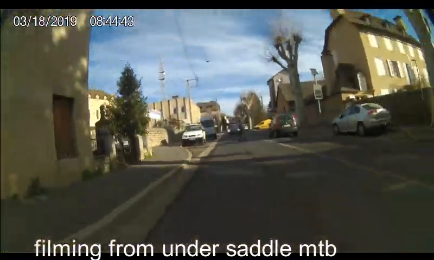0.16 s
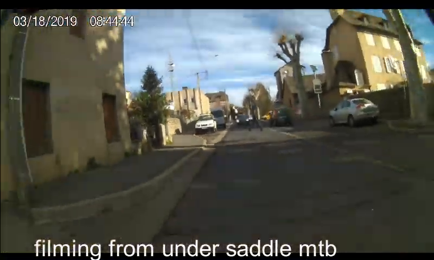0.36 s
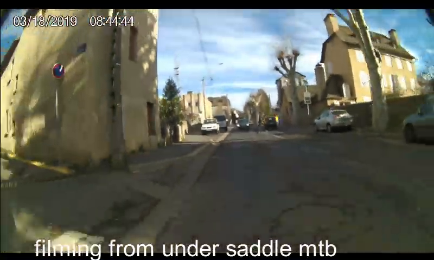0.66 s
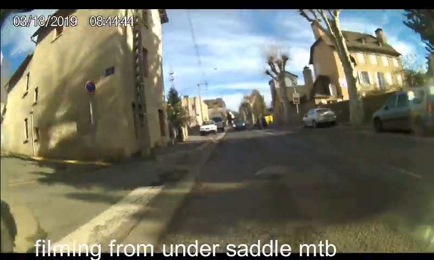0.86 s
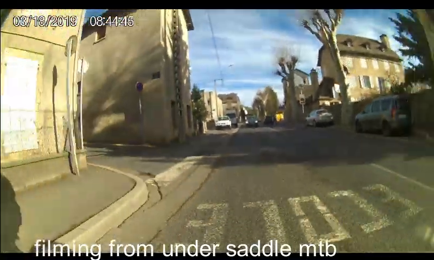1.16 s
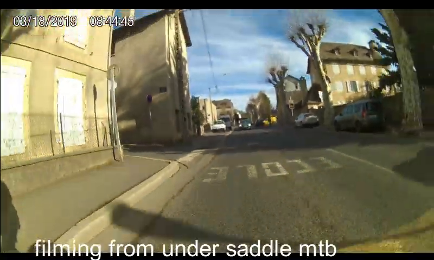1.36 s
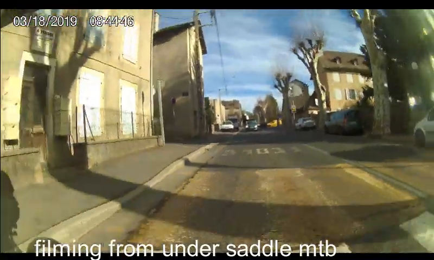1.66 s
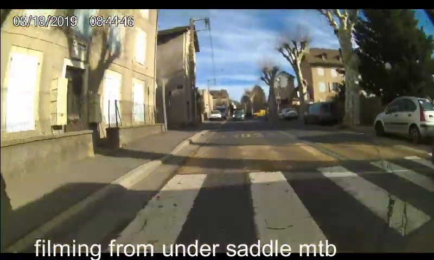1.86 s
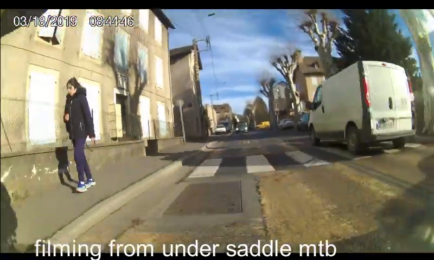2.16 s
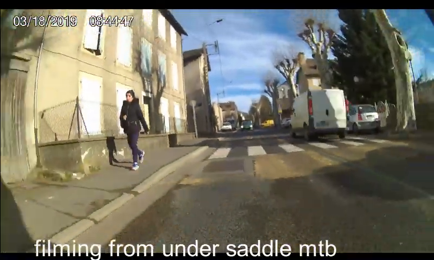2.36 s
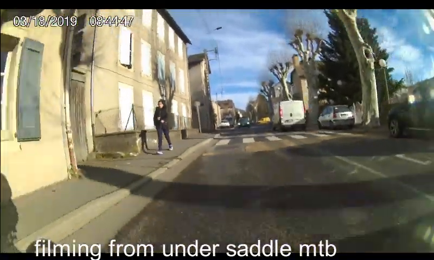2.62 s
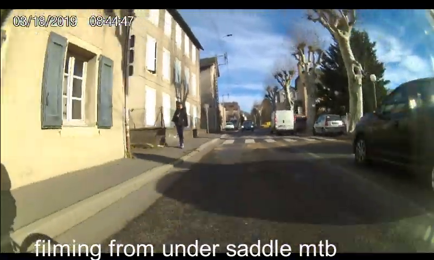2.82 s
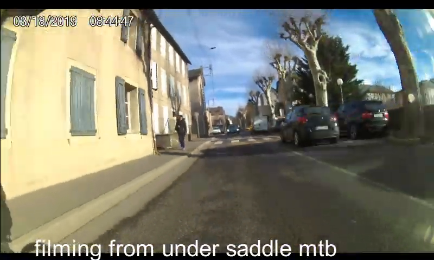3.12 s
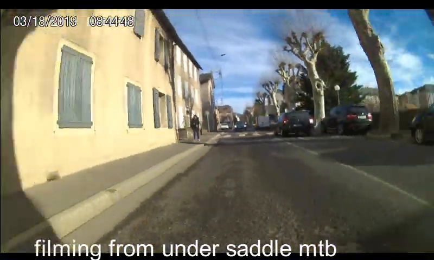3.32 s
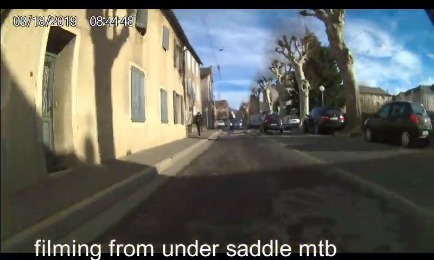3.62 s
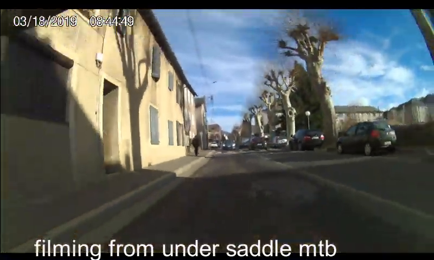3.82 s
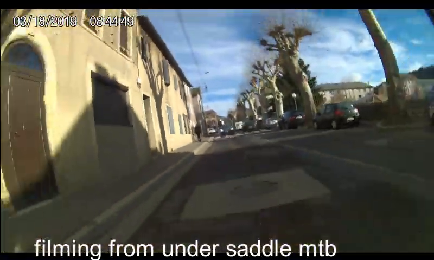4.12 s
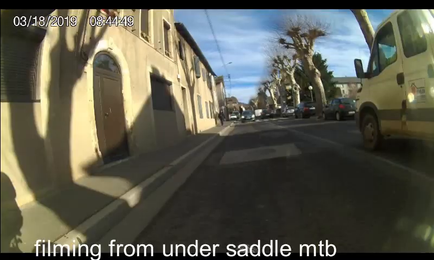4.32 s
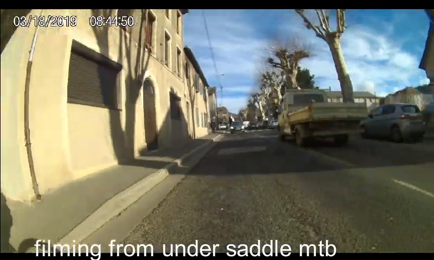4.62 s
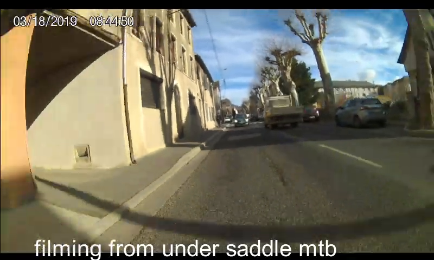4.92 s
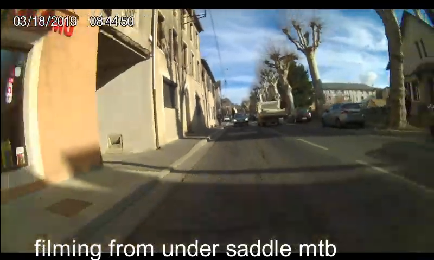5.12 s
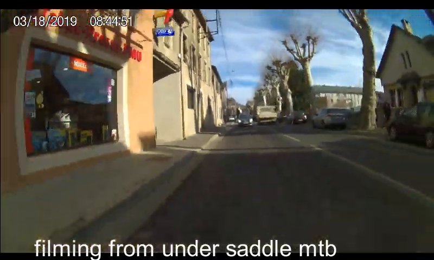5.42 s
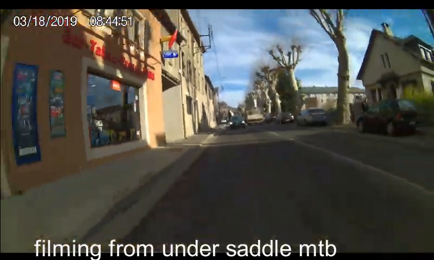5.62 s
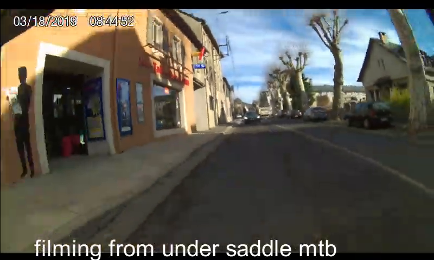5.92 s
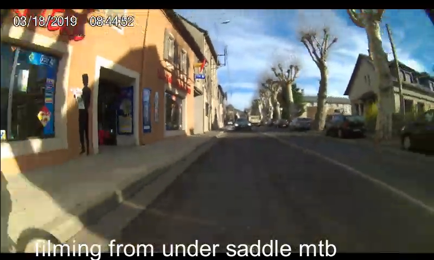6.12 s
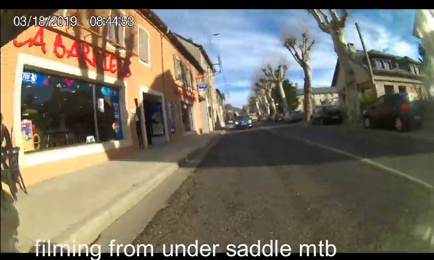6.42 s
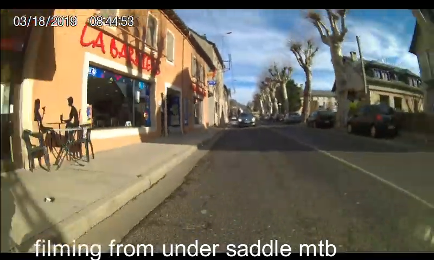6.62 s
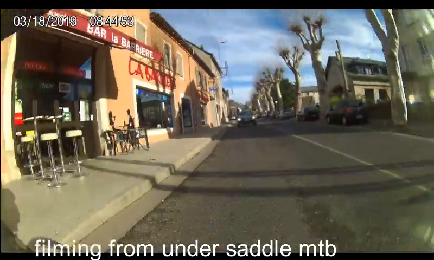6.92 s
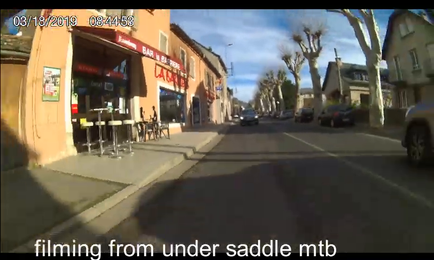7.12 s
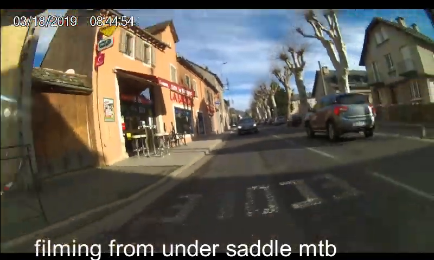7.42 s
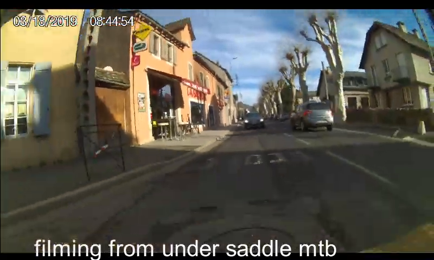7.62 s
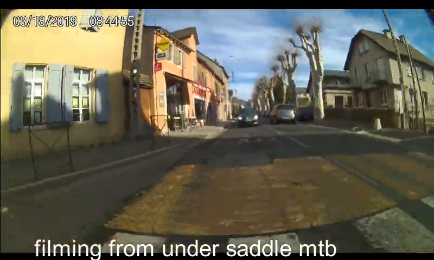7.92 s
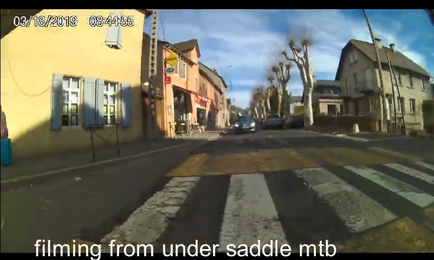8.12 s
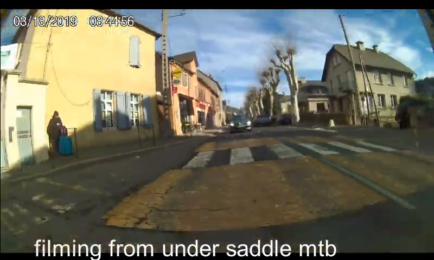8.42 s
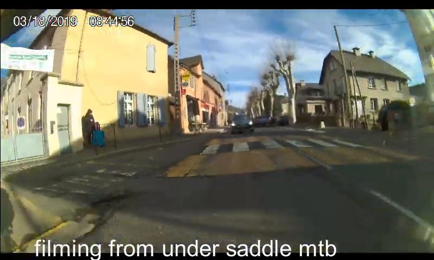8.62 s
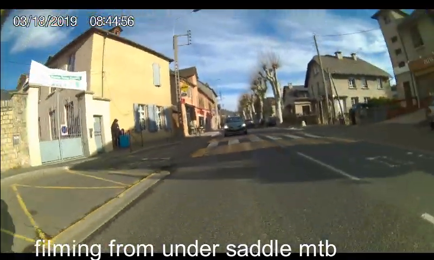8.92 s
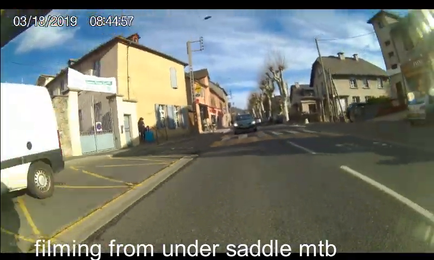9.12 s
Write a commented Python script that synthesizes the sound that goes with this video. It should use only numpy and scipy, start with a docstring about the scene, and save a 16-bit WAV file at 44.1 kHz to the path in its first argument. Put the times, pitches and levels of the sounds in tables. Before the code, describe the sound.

Sharp, irregular plastic clacks and ticks from a loose bicycle mount, with faint road rumble underneath.

```python
"""Under a bicycle saddle, rolling over worn asphalt: a small camera knocks about in its plastic case.
Each jolt throws it against the case, which rings for milliseconds, brighter the harder the blow.
It rebounds, then swings on its loose mount, one rattle a swing. Hard knocks set the joint chattering
and ticking. Road buzz and tyre hum come up through the frame. The camera's fast limiter flattens
the hard knocks."""
import sys
import numpy as np
from scipy import signal
from scipy.fft import rfft, irfft
from scipy.io import wavfile
from scipy.ndimage import uniform_filter1d, minimum_filter1d

SR = 44100
rng = np.random.default_rng(int(sys.argv[2]) if len(sys.argv) > 2 else 0)


def persist_wave(psi):
    """Save psi, clipped to +-1, as 16-bit WAV."""
    counts = np.round(np.clip(psi, -1, 1) * 32767).astype(np.int16)
    wavfile.write(sys.argv[1], SR, np.atleast_2d(counts).T)


N = 408366

# Camera hits case. Each row: start in seconds, relative level in dB.
KNOCKS = [(0.02, -2), (0.074, 0.5), (0.2765, 6.5), (0.3615, 9.5), (0.3992, -5), (0.4354, 7), (0.4754, 5.5),
          (0.5156, 2.5), (0.5982, 7.5), (0.679, -3.5), (0.8381, 2.5), (0.9231, 4.5), (1.042, 6),
          (1.128, -2), (1.249, -9), (1.3441, 4), (1.4993, 4.5), (1.6926, 3), (1.792, -0.5), (1.8641, 2),
          (1.9264, -3.5), (2.1766, 4.5), (2.2594, 3), (2.3529, 9), (2.4145, 4), (2.4929, 4.5), (2.5772, 4),
          (2.6584, 7), (2.745, 2), (2.809, 2.5), (3.0967, 18.5), (3.1618, -6), (3.1719, -4), (3.2166, 12.5),
          (3.2331, -3.5), (3.314, 9.5), (3.4208, 13), (3.551, 14), (3.626, 12.5), (3.6642, 5),
          (3.8364, 2.5), (3.9454, 5.5), (4.0795, -4), (4.1459, -3.5), (4.217, 6), (4.3386, 0),
          (4.4214, 6.5), (4.498, 3.5), (4.5503, 1), (4.645, -10.5), (4.7153, -6), (4.765, 1.5), (4.826, 3),
          (4.9244, 4), (5.0402, -0.5), (5.151, -12), (5.1883, -0.5), (5.2228, 16), (5.3139, 13.5),
          (5.4352, 12.5), (5.5197, 15), (5.5363, 2), (5.556, -7), (5.6033, -16.5), (5.6341, 17),
          (5.7182, 1), (5.7346, -3.5), (5.756, 12.5), (5.8802, 15.5), (5.9921, 11), (6.116, 12),
          (6.2279, 6.5), (6.2881, -2), (6.3504, 13), (6.46, -14), (6.5357, 6), (6.5728, 12.5),
          (6.6578, 12.5), (6.7548, -11), (6.787, 7), (6.8789, -6), (7.0352, -12), (7.147, -13.5),
          (7.1729, -10), (7.2678, 9.5), (7.356, -9), (7.459, -1), (7.5654, 1), (7.663, 17.5),
          (7.7866, -3.5), (7.8954, 6), (8.0332, 12.5), (8.14, 11.5), (8.2185, 13), (8.3444, 10),
          (8.4711, 12), (8.5207, 2), (8.5636, -10), (8.5993, 16), (8.6176, 0), (8.7028, -1.5), (8.7364, 18),
          (8.757, -2), (8.8828, 17.5), (9.0017, 18), (9.148, 3.5)]
# Ringing tones of a knock; the weak 1595 and 2416 Hz ones imitate limiter distortion. Each row:
# frequency in Hz, T60 in seconds, level in dB, polarity at the microphone, extra dB at full force.
KNOCK_TONES = [(63, 0.094, -40, 1, 0), (385, 0.056, -39, -1, -4), (781, 0.029, -17, 1, 0.5),
               (853, 0.006, -5.5, -1, 4), (1363, 0.022, -1, 1, 0), (1595, 0.08, -34, -1, 12),
               (1790, 0.026, -2, 1, -3.5), (1920, 0.013, 4, -1, -5), (2416, 0.072, -29, 1, -8.5),
               (2855, 0.014, -2, 1, -1.5), (3184, 0.017, -12.5, -1, 2.5)]
# Tick runs of the loose joint. Each row: start in seconds, relative level in dB, length in seconds.
FLURRIES = [(0.3704, -37, 0.004), (3.1346, -41, 0.004), (3.2536, -35, 0.004), (3.4007, -44, 0.004),
            (3.4513, -45.5, 0.014), (3.706, -38.5, 0.023), (3.7685, -33, 0.004), (5.2652, -41.5, 0.004),
            (5.53, -33.5, 0.023), (5.5752, -39, 0.004), (5.689, -47, 0.004), (5.7292, -34.5, 0.004),
            (6.0153, -43.5, 0.014), (6.46, -31.5, 0.014), (6.7823, -37.5, 0.023), (6.9633, -46, 0.004),
            (7.3831, -44, 0.004), (7.6945, -37, 0.004), (7.754, -40.5, 0.023), (7.7957, -35, 0.032),
            (7.8707, -37, 0.004), (7.9566, -47.5, 0.004), (8.0807, -35.5, 0.004), (8.2373, -34, 0.014),
            (8.2725, -34, 0.004), (8.3575, -36.5, 0.014), (8.5039, -34, 0.004), (8.5332, -33.5, 0.004),
            (8.651, -38, 0.014), (8.713, -34, 0.014), (8.8096, -38.5, 0.004), (8.9173, -41, 0.014),
            (9.0203, -39, 0.004), (9.0775, -36, 0.032)]
# Asphalt coarseness. Each row: time in seconds, then relative buzz, shiver and rumble levels in dB.
ROAD_LEVELS = [(0.0, -36, -45.5, -45), (0.57, -40.5, -50, -49), (0.77, -39, -53, -49),
               (2.99, -37, -50, -45.5), (3.33, -37.5, -43, -52.5), (3.66, -36.5, -44, -51.5),
               (4.07, -38.5, -53.5, -46), (5.1, -40, -49.5, -48), (5.65, -32.5, -31, -50.5),
               (5.98, -36, -46, -49.5), (6.42, -37.5, -43.5, -45.5), (7.45, -36, -47.5, -45.5),
               (8.64, -36.5, -37, -47), (9.26, -36, -40.5, -46.5)]
# Tread hum. Each row: time in seconds, relative level in dB.
TREAD_LEVELS = [(0.0, -60.5), (0.51, -54.5), (1.8, -57.5), (2.68, -50.5), (3.61, -62), (4.05, -53.5),
                (6.57, -55.5), (6.73, -50.5), (9.26, -59.5)]
# Spectra of the noises, then the knocks' roll-off and the camera. Each row: frequency in Hz, gain in dB.
HISS_EQ = [(5000, -8.5), (8000, -15), (9200, -12), (11500, -3.5), (14000, -2.5), (16000, -2)]
BUZZ_EQ = [(300, -27.5), (560, -23), (780, -10), (900, -13), (1150, -4), (1270, -3), (1370, 4.5),
           (1480, -9.5), (1650, -8), (1950, -7), (2400, -27), (3000, -24), (4000, -45), (5500, -76.5)]
RUMBLE_EQ = [(20, -16.5), (40, -8), (70, -0.5), (110, 0.5), (180, -6), (300, -3), (420, -5), (600, -16),
             (1200, -57)]
TICK_EQ = [(200, -29.5), (1000, 1), (1360, 7.5), (1650, 10.5), (2000, 15), (2400, 10), (2900, 11),
           (4000, -0.5), (5000, -16), (6000, -49.5), (7000, -33), (8000, -67.5), (11500, -20), (15000, -45)]
SNAP_EQ = [(2000, -9), (4200, 14.5), (5800, -7), (7000, 4.5), (8000, -17.5), (9500, -7), (12000, 1.5),
           (15000, -17.5)]
RATTLE_EQ = [(900, -21.5), (1400, -2.5), (1900, -3), (2400, 4.5), (2950, -2), (3300, -20), (4200, -29.5),
             (6000, -60)]
RASP_EQ = [(40, -4), (150, -10), (500, -20), (1500, -20), (3500, -10), (5000, 4), (6200, -18.5),
           (7000, -16.5), (8000, -36), (9200, -10.5), (11500, 3), (13500, 1.5), (16000, -6.5)]
SHIVER_EQ = [(1500, -41), (2400, -11.5), (2900, -7.5), (3400, -22.5), (4500, -39), (6000, -72)]
KNOCK_TREBLE_EQ = [(3000, -2), (4000, -7), (5500, -14), (8000, -33.5)]
CAMERA_EQ = [(3500, 0.5), (5000, 3.5), (6200, -1), (7200, -4.5), (8000, -9.5), (9000, 6), (12000, -4.5)]

TIME_S = np.arange(N) / SR


def undb(db):
    """Decibels to gain."""
    return 10 ** (np.asarray(db) / 20)


def unit(x):
    """Scale to rms 1."""
    return x / np.sqrt(np.mean(x ** 2))


def add(out, start_s, sound):
    """Mix a short sound in at start_s."""
    i = int(np.clip(start_s * SR, 0, N - 1))
    out[i:i + len(sound)] += sound[:N - i]


def colour(x, eq, size=4096):
    """Minimum-phase filter from a (Hz, dB) curve."""
    hz, db = np.transpose(eq)
    grid_hz = np.maximum(np.fft.rfftfreq(size, 1 / SR), 1)
    gain = undb(np.interp(np.log(grid_hz), np.log(hz), db))
    cepstrum = irfft(np.log(gain))
    cepstrum[1:size // 2] *= 2
    cepstrum[size // 2 + 1:] = 0
    impulse = irfft(np.exp(rfft(cepstrum)))
    return signal.fftconvolve(x, impulse)[:len(x)]


def wander(rate_hz):
    """Smooth random drift, rms 1."""
    hold = int(SR / rate_hz)
    steps = np.repeat(rng.standard_normal(N // hold + 1), hold)
    return unit(uniform_filter1d(steps, hold)[:N])


def grit(rate_hz, spread_db):
    """Random tiny contacts of uneven size, rms 1."""
    sizes = rng.standard_normal(N) * undb(spread_db * rng.standard_normal(N))
    return unit((rng.random(N) < rate_hz / SR) * sizes)


def bursts(starts_s, gains, decay_s, attack_s=0.00047):
    """Envelope: fast rise at each start, exponential decay."""
    out, t = np.zeros(N), np.arange(4000) / SR
    for start_s, gain in zip(starts_s, gains):
        add(out, start_s, gain * np.exp(-t / decay_s) * (1 - np.exp(-t / attack_s)))
    return out


def self_noise(hiss_db=-82, whine_db=-91, whine_hz=10010, beat_hz=70):
    """Faint microphone hiss and a thin, beating whine from the electronics."""
    hiss = unit(colour(rng.standard_normal(N), HISS_EQ))
    whine = unit(np.sin(2 * np.pi * whine_hz * TIME_S) * np.cos(np.pi * beat_hz * TIME_S))
    return hiss * undb(hiss_db) + whine * undb(whine_db)


def tyre_hum(start_hz=250, rise_hz_per_s=2.2, waver_hz=10, throb=0.8, trim_db=1):
    """Tread blocks meet the road: a throbbing hum that rises as the bike gathers speed."""
    pitch_hz = start_hz + rise_hz_per_s * TIME_S + waver_hz * wander(27)
    phase = 2 * np.pi * np.cumsum(pitch_hz) / SR
    hum = unit(np.sin(phase) * (1 + throb * wander(22)))
    level_db = np.interp(TIME_S, *np.transpose(TREAD_LEVELS))
    return hum * undb(level_db + trim_db)


def road_buzz():
    """Asphalt grain shakes the frame: case buzz, rumble and a fitful shiver of the mount."""
    times_s, buzz_db, shiver_db, rumble_db = np.transpose(ROAD_LEVELS)

    def level(db, trim_db, flutter_db, flutter_hz):
        return undb(np.interp(TIME_S, times_s, db) + trim_db + flutter_db * wander(flutter_hz))

    buzz = unit(colour(grit(rate_hz=9000, spread_db=4.5), BUZZ_EQ))
    buzz *= level(buzz_db, trim_db=1.5, flutter_db=3, flutter_hz=35)
    rumble = unit(colour(rng.standard_normal(N), RUMBLE_EQ))
    rumble *= level(rumble_db, trim_db=-0.5, flutter_db=0.9, flutter_hz=11)
    shiver = unit(colour(grit(rate_hz=3100, spread_db=-3), SHIVER_EQ))
    shiver *= level(shiver_db, trim_db=-5, flutter_db=4, flutter_hz=70)
    return buzz + rumble + shiver


def knock_force(db):
    """0 for an ordinary knock, up to 1 for one that unseats the mount."""
    return np.clip((db - 5) / 9, 0, 1)


def mount_rattle(swing_s=0.042, jitter_s=0.003, level_db=-19, scatter_db=3.5, max_swings=6):
    """The camera swings on its mount after a knock: one faint rattle a swing, cut off by the next knock."""
    knocks_s = [s for s, _ in KNOCKS]
    starts_s, gains = [], []
    for knock_s, next_s in zip(knocks_s, knocks_s[1:] + [N / SR]):
        for swing, (late, loud) in enumerate(rng.standard_normal((max_swings, 2)), start=1):
            start_s = knock_s + swing * swing_s + jitter_s * late
            if start_s < next_s - swing_s / 2:
                starts_s.append(start_s)
                gains.append(undb(level_db + scatter_db * loud))
    envelope = bursts(starts_s, gains, decay_s=0.0021)
    return colour(envelope * grit(rate_hz=29000, spread_db=2.5), RATTLE_EQ)


def tick_times(gap_s=0.00828, gap_spread=0.28, fall_db=1.5, scatter_db=2, delay_s=0.012, max_ticks=5):
    """Ticks (s, dB) in uneven, fading runs: the listed flurries, plus one after each forceful knock."""
    flurries = list(FLURRIES)
    for knock_s, db in KNOCKS:
        force = knock_force(db)
        flurries.append((knock_s + delay_s, -41 - 34 * (1 - force), 0.014 * force))
    ticks = []
    for start_s, db, length_s in flurries:
        for k, (late, loud) in enumerate(rng.standard_normal((max_ticks, 2))):
            if k * gap_s < length_s:
                ticks.append((start_s, db - k * fall_db + scatter_db * loud))
            start_s += gap_s * np.exp(gap_spread * late)
    return ticks


def joint_ticks(body_db=22.5, snap_db=3):
    """The loose joint ticks: a gritty body under a shorter, bright snap."""
    starts_s, db = np.transpose(tick_times())
    body = bursts(starts_s, undb(db + body_db), decay_s=0.0036) * grit(rate_hz=12000, spread_db=1)
    snap = bursts(starts_s, undb(db + snap_db), decay_s=0.0023) * rng.standard_normal(N)
    return colour(body, TICK_EQ) + colour(snap, SNAP_EQ)


def joint_chatter(level_db=-7):
    """Hard knocks unseat the joint; it chatters with the square of the force."""
    starts_s, db = np.transpose(KNOCKS)
    envelope = bursts(starts_s, knock_force(db) ** 2 * undb(level_db), decay_s=0.0078)
    return colour(envelope * grit(rate_hz=1700, spread_db=1.5), TICK_EQ)


def knock_ring(contact_hz, force, draws, detune=0.008, scatter_db=1.2):
    """One blow on the case, peak 1: decaying tones, low-passed by the contact, rebalanced by force."""
    hz, t60_s, db, polarity, force_db = np.transpose(KNOCK_TONES)
    pitch_draw, level_draw = draws.reshape(2, -1)
    t = np.arange(1500)[:, None] / SR
    damping = 1 + 0.16 * force  # the camera presses on the case
    decay = np.exp(-np.log(1000) * t * damping / t60_s)
    tones = np.sin(2 * np.pi * hz * (1 + detune * pitch_draw) * t) * decay
    gains = polarity * undb(db + force * force_db + scatter_db * level_draw)
    ring = signal.sosfilt(signal.butter(4, contact_hz, fs=SR, output="sos"), tones @ gains)
    return ring / np.abs(ring).max()


def taps(level_db=-24, spread_db=4, contact_hz=1700, count=60):
    """Asphalt grains nudge the camera into light, soft taps."""
    out = np.zeros(N)
    starts_s = rng.random(count) * N / SR
    for start_s in starts_s:
        gain = undb(level_db + spread_db * rng.standard_normal())
        draws = rng.standard_normal(2 * len(KNOCK_TONES))
        add(out, start_s, gain * knock_ring(contact_hz, force=0, draws=draws))
    return out


def contact_cutoff_hz(start_s, db, soft_hz=1580, hard_hz=4600, dull_hz=1490, near_s=0.04):
    """Harder knock, shorter contact, higher cutoff."""
    # a knock just before or after a far harder one sounds dull
    if any(abs(start_s - other_s) < near_s and other_db > db + 8 for other_s, other_db in KNOCKS):
        return dull_hz
    hardness = 1 / (1 + np.exp((4 - db) / 5))  # halfway at 4 dB
    return soft_hz + (hard_hz - soft_hz) * hardness


def knocks(rebound_s=0.0185, rebound_db=-24, rebound_force_db=3, rebound_contact_hz=1450):
    """The camera hits the case and falls back. The microphone's treble roll-off softens the knocks."""
    out = np.zeros(N)
    for start_s, db in KNOCKS:
        force = knock_force(db)
        delay_s = rebound_s * np.exp(0.1 * rng.standard_normal())
        draws = rng.standard_normal(2 * len(KNOCK_TONES))
        blow = knock_ring(contact_cutoff_hz(start_s, db), force, draws)
        rebound = knock_ring(rebound_contact_hz, force=0, draws=-draws)
        add(out, start_s, undb(db) * blow)
        add(out, start_s + delay_s, undb(db + rebound_db + force * rebound_force_db) * rebound)
    return colour(out, KNOCK_TREBLE_EQ)


def scene():
    """Mono sum at the microphone."""
    case = knocks() + taps()
    mount = joint_ticks() + joint_chatter() + mount_rattle()
    return (case + mount + road_buzz() + tyre_hum() + self_noise())[None]


def record(dry, ceiling=0.67, window_samples=15, knee=0.18, rasp_db=-21, top_hz=15900):
    """A fast limiter flattens the knocks; the wave tips still overload and rasp. Then EQ and low-pass."""
    x = dry[0]
    needed = np.minimum(1, ceiling / np.maximum(np.abs(x), 1e-9))
    gain = uniform_filter1d(minimum_filter1d(needed, window_samples), window_samples)
    limited = x * gain
    tips = limited - np.clip(limited, -knee, knee)
    overload = tips * (1.05 - gain)  # more limiting, more rasp
    rasp = undb(rasp_db) * colour(overload * rng.standard_normal(N), RASP_EQ)
    lowpass = signal.ellip(8, 0.2, 70, top_hz, fs=SR, output="sos")
    return signal.sosfilt(lowpass, colour(limited + rasp, CAMERA_EQ))[None]


dry = scene()
out = record(dry)
persist_wave(out)
```